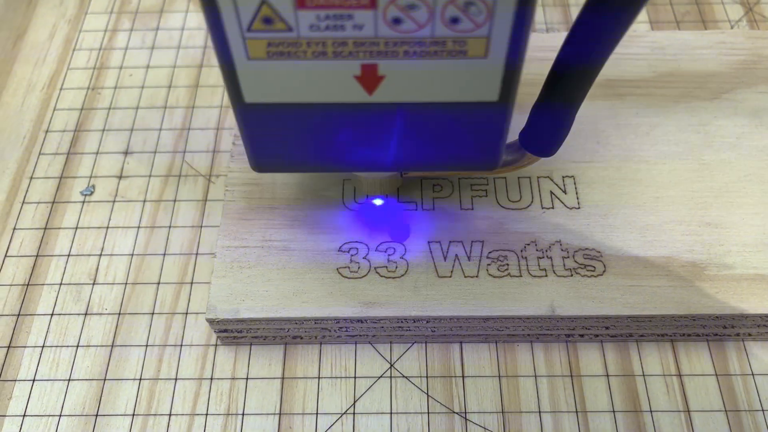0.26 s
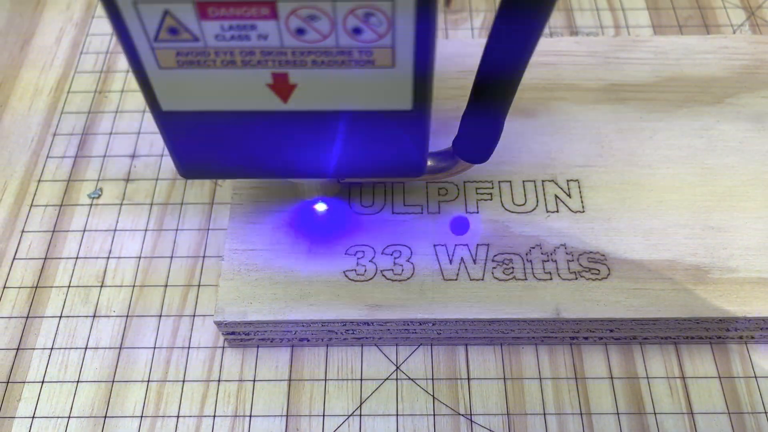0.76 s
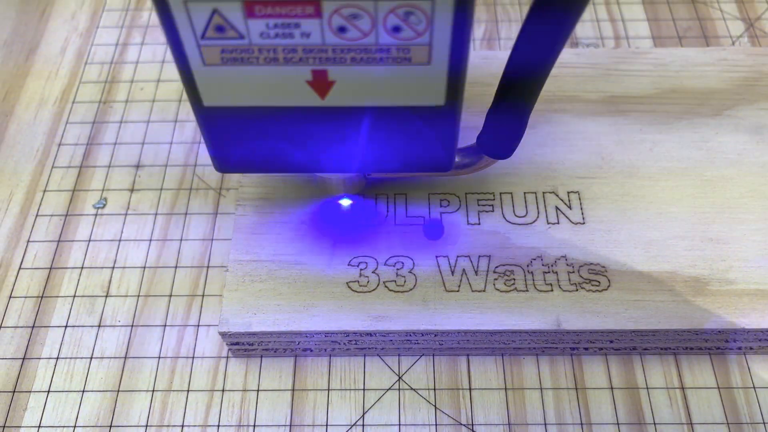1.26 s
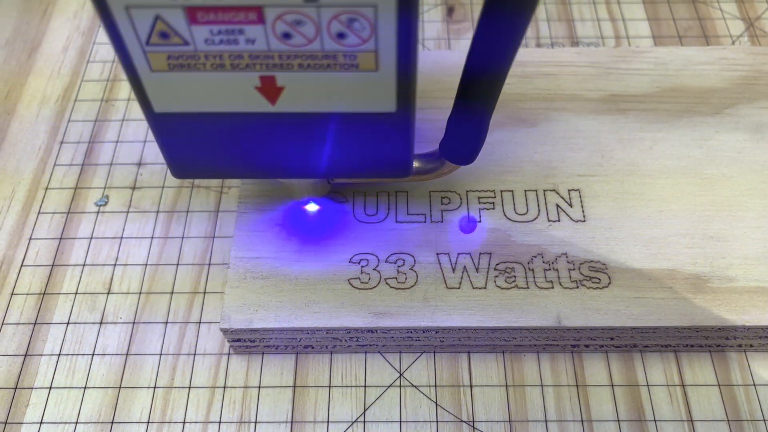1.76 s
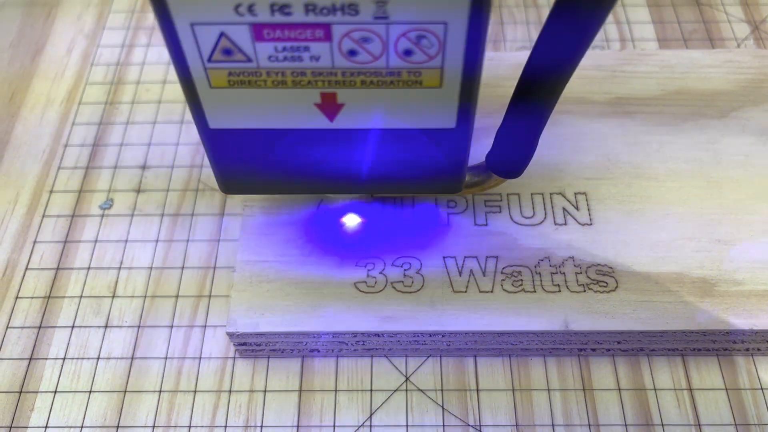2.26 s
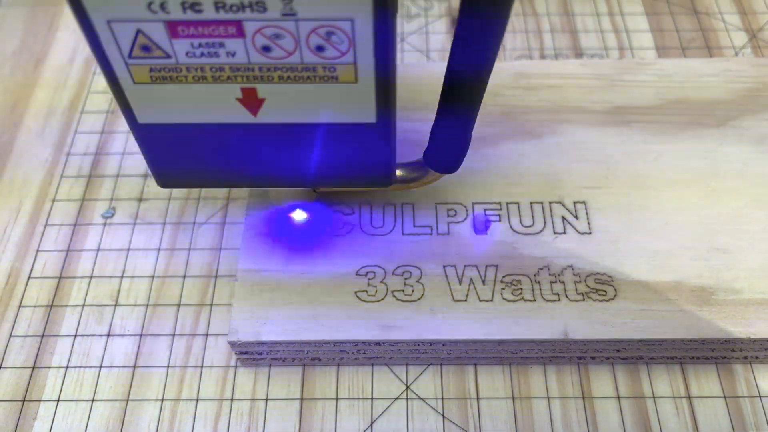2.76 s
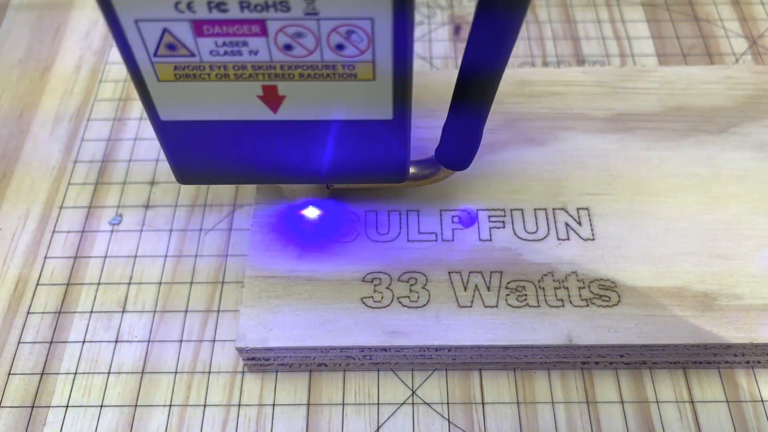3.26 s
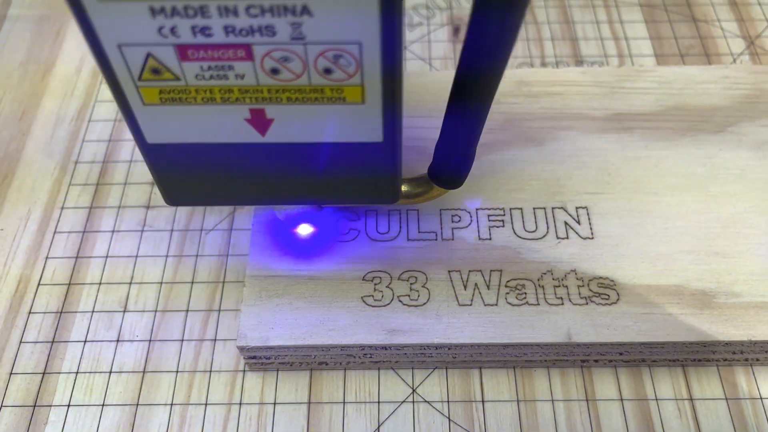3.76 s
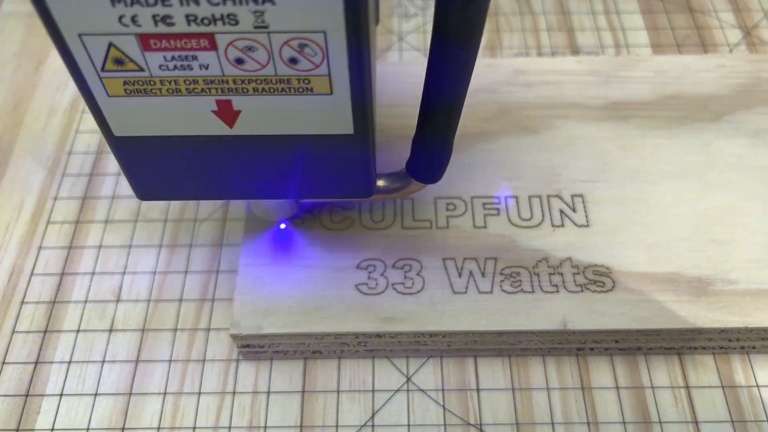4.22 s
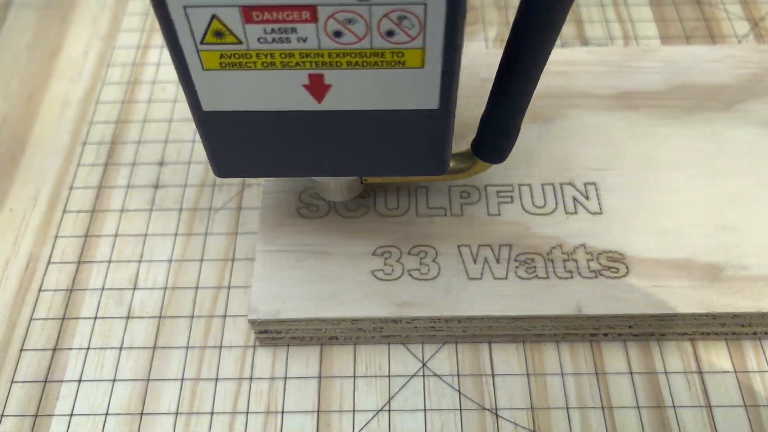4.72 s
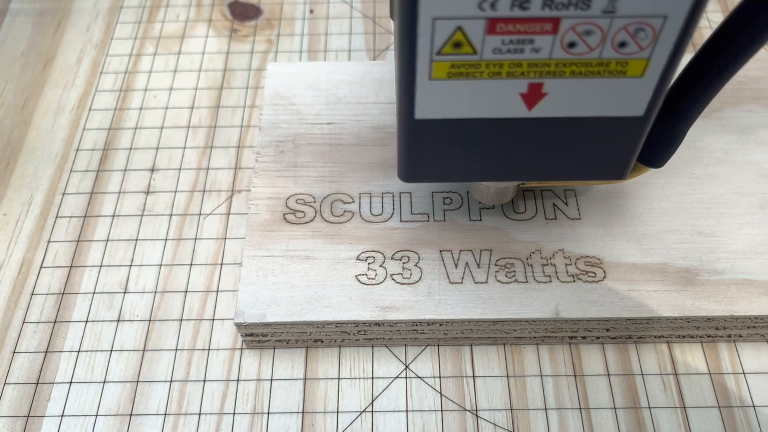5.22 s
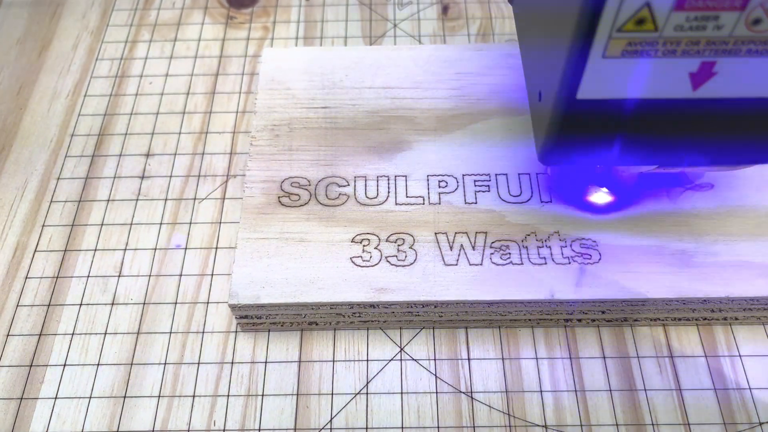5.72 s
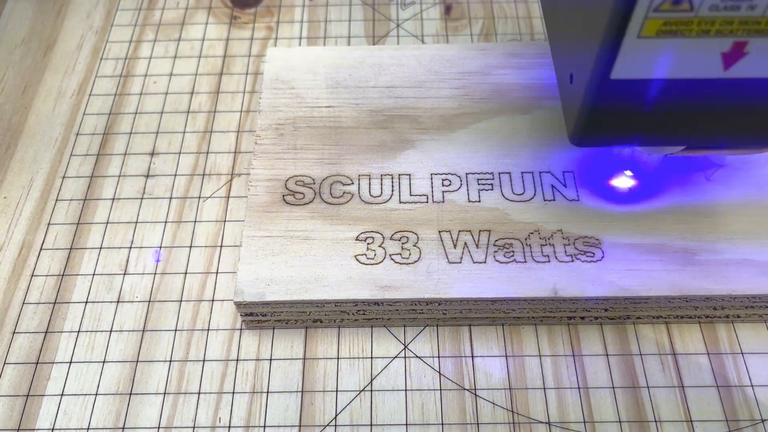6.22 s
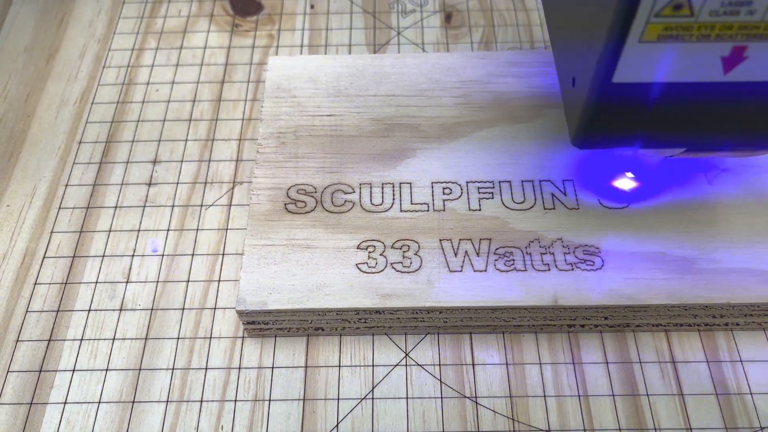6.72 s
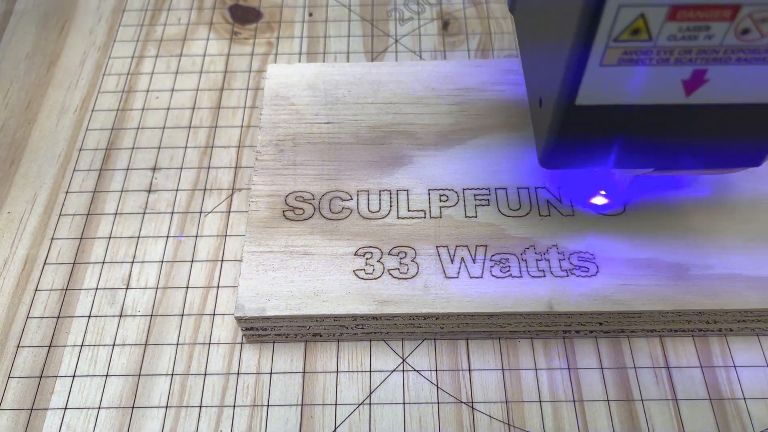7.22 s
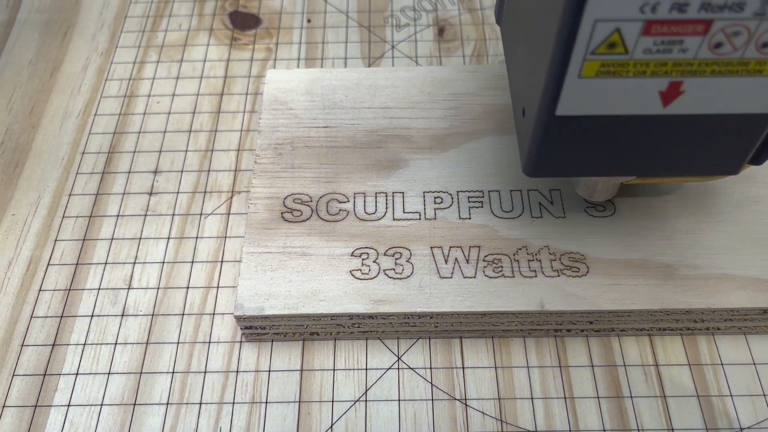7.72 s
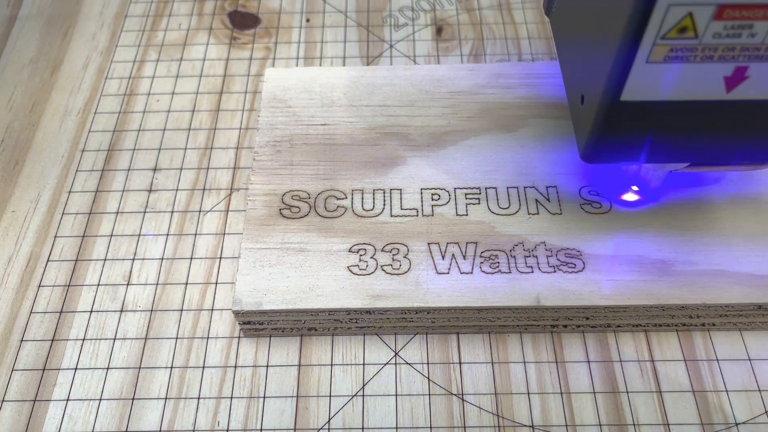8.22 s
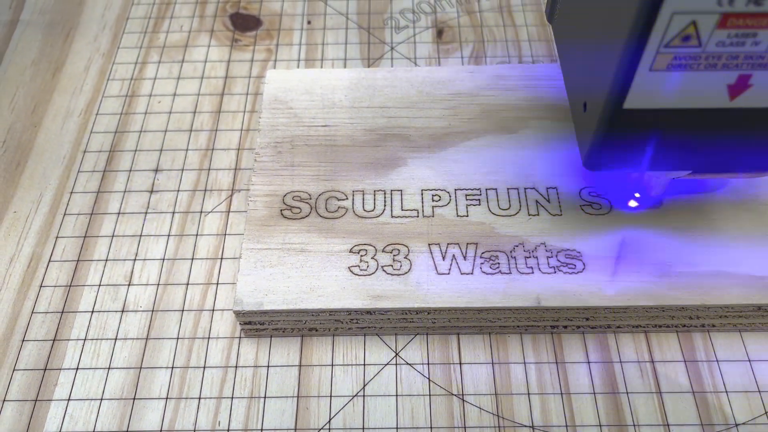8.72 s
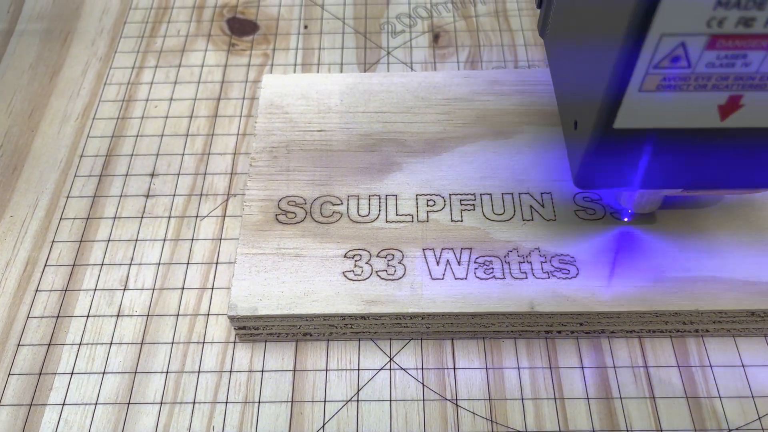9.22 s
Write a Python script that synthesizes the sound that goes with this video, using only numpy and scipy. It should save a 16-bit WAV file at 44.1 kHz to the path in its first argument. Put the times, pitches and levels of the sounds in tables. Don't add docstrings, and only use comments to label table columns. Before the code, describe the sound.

A laser engraver burns plywood close by, its cooling fan singing shrilly over pump hum, rushing air and an on-off buzzing, sizzling whistle.

```python
import sys
import numpy as np
from scipy import signal
from scipy.fft import rfft, irfft, next_fast_len
from scipy.io import wavfile
from scipy.ndimage import uniform_filter1d

SR = 44100
rng = np.random.default_rng(int(sys.argv[2]) if len(sys.argv) > 2 else 0)


def master(y):
    cut = np.clip(np.atleast_2d(y).T, -1, 1)
    pcm = np.round(cut * 32767)
    wavfile.write(sys.argv[1], SR, pcm.astype(np.int16))


def attenuation_scalar(level_db):
    decades = np.asarray(level_db, float) / 20
    return 10 ** decades


N = 418068


def read(table, hz):
    curve_hz, value = np.transpose(table)
    return np.interp(np.log(hz + 1), np.log(curve_hz), value)


def walk(rate):
    steps = np.repeat(rng.standard_normal(int(rate * N / SR) + 2), 16)
    steps = uniform_filter1d(uniform_filter1d(steps, size=16), size=16)
    return 1.3 * np.interp(np.arange(N) * rate * 16 / SR, np.arange(len(steps)), steps)


def tones(table, hz, place, wobble_db, rate, blur):
    turn = 2 * np.pi * np.cumsum(hz + np.zeros(N)) / SR
    out = np.zeros((2, N))
    for multiple, *heard in table:
        from_left, from_front = heard[:3], heard[3:]
        left_db, right_db, lead = (a + (b - a) * place for a, b in zip(from_left, from_front))
        phase = multiple * turn + 2 * np.pi * rng.random() + blur * walk(rate)
        size = np.sqrt(2) * attenuation_scalar(wobble_db * walk(rate))
        left = attenuation_scalar(left_db) * np.sin(phase)
        right = attenuation_scalar(right_db) * np.sin(phase - lead)
        out += size * np.array([left, right])
    return out


# start_s, stop (0 first letter, 1 left, 2 passing, 3 in front, 4 in front and nearer)
TRAVEL = [
    (0, 0.),
    (.35, 0.),
    (.65, 1.),
    (4.7, 1.),
    (5.05, 2.),
    (5.4, 2.),
    (5.65, 3.),
    (7.3, 3.),
    (8.15, 4.),
    (9.48, 4.),
]


def head_stop(t):
    return np.clip(np.interp(t, *np.transpose(TRAVEL)), 0, len(FRONT_SHARE) - 1)


FRONT_SHARE = [
    0,
    0,
    .55,
    1,
    1,
]


def head_place(stop):
    return np.clip(np.interp(stop, range(len(FRONT_SHARE)), FRONT_SHARE), 0, 1)


# start_s, facing (negative nozzle away from the phone, positive toward it)
CREEP = [(0, -1.9), (1.3, -1), (2.9, -0.64), (4.5, 0.72), (5.6, 0.79), (6.7, 0.96), (7.3, 0.38),
         (8.3, 0.19), (9.48, -0.25)]


def head_creep(t):
    return np.interp(t, *np.transpose(CREEP))


# start_s, end_s, depth (0-1)
BEAM_OFF = [(.295, .504, 1), (.592, .622, 1), (1.117, 1.138, .9), (1.243, 1.257, .8), (2.336, 2.564, 1),
            (2.994, 3.016, 1), (3.124, 3.137, .8), (4.045, 4.057, .5), (4.167, 4.176, .7),
            (4.663, 5.659, 1), (6.566, 6.592, .9), (6.705, 6.722, .6), (7.58, 7.62, .75), (7.735, 7.99, 1),
            (8.36, 8.468, 1), (8.705, 8.725, .9), (8.914, 8.927, .8), (9.037, 9.06, .9), (9.468, 9.5, .6)]
FADE_S = .004


def burning(t):
    dark = sum(((t > a - FADE_S) & (t < b + FADE_S)) * depth for a, b, depth in BEAM_OFF)
    return uniform_filter1d(np.clip(1 - dark, 0, 1), int(FADE_S * SR))


# multiple, from the left left_db, right_db, left_leads_rad, then the same from the front
PUMP = [(2, -35, -36.5, 0.27, -35.5, -36, 0.079), (4, -44, -47, 0.23, -44, -46.5, -0.077),
        (6, -49.5, -52.5, 0.18, -49.5, -52.5, .1), (8, -54.5, -52, .1, -51, -52.5, -0.23),
        (10, -49, -56, 0.92, -50, -57.5, -0.065), (14, -50.5, -75, .4, -54.5, -60, -.1),
        (15, -53.5, -65, .5, -57, -60, -.2), (16, -56, -64, .2, -59, -62, -.1),
        (17, -60, -64, .1, -60, -62, -.3), (18, -62, -60, .1, -61, -64, -.4),
        (19, -67, -74, .4, -59, -54, -.2)]
PUMP_HZ = 50.2


def pump_hum(place):
    surge = attenuation_scalar(.35 * walk(1.6))
    return surge * tones(PUMP, PUMP_HZ, place, wobble_db=0.36, rate=6, blur=0.088)


MAINS = [(2, -53.5, -46, .1, -49.5, -47, 0.), (4, -58.5, -51.5, .2, -53.5, -51.5, 0.)]
MAINS_HZ = 60.1


def mains_hum(place):
    return tones(MAINS, MAINS_HZ, place, wobble_db=-1.0, rate=4.4, blur=0.053)


FAN_LOADED_HZ, FAN_FREE_HZ, FAN_START_HZ, FAN_LAG_S = 1172.7, 1178.2, 1174.6, .52


def fan_rate(burn):
    keep = np.exp(-1 / (FAN_LAG_S * SR))
    goal = FAN_FREE_HZ + (FAN_LOADED_HZ - FAN_FREE_HZ) * burn
    return FAN_START_HZ + signal.lfilter([1 - keep], [1, -keep], goal - FAN_START_HZ)


FAN = [(1, -26, -33, 2.2, -28.6, -27, .45), (2, -40, -39.5, .2, -43.5, -43.5, .1),
       (3, -40.7, -41.7, .2, -52, -52, 1.), (4, -49, -52, .4, -54, -54, .7),
       (16 / 7, -54, -55, .5, -59, -59, 0.)]
FAN_TURN_DB = -0.16


def fan_song(burn, place, creep):
    song = tones(FAN, fan_rate(burn), place, wobble_db=0.24, rate=25, blur=0.16)
    return attenuation_scalar(FAN_TURN_DB * creep) * song


BEAM = [(1, -38, -39, .3, -40.5, -35.6, -.1), (2, -36.6, -38.3, .7, -36.3, -36, .25),
        (3, -43.5, -44.5, 1.5, -46, -47, 0.), (4, -48, -60, -2., -52, -52, .3),
        (5, -48, -54, 0., -56, -55, 0.), (6, -43, -48, -1.3, -43, -47, -1.45),
        (7, -49, -47, -1.6, -50.5, -49.5, -1.7)]
CHOP_HZ = 1000
BEAM_TURN_DB = 0.4


def beam_whistle(burn, place, creep):
    whistle = tones(BEAM, CHOP_HZ, place, wobble_db=.45, rate=15, blur=.05)
    return burn * attenuation_scalar(BEAM_TURN_DB * creep) * whistle


# pitch_hz, level_db (per Hz)
RUSH_LOW = [
    [(25, -83), (41, -70), (69, -60), (272, -67), (323, -69.5), (900, -67), (1300, -57.5), (1550, -65.5), (1750, -65), (1950, -69.5), (2200, -72.5)],
    [(25, -89), (41, -67), (58, -67), (137, -62), (193, -71), (229, -68), (758, -70.5), (1350, -59), (1700, -68.5), (2000, -67.5), (2200, -71)],
]
# pitch_hz, level_db (per Hz)
RUSH_HIGH = [(2200.0, -72.0), (2800.0, -68.1), (3300.0, -67.9), (4600.0, -64.3), (5200.0, -65.0),
             (6100.0, -63.9), (7200.0, -66.4), (7900.0, -68.9), (8600.0, -64.6), (9500.0, -65.6),
             (10000.0, -67.2), (10500.0, -66.5), (12500.0, -70.2), (15650.0, -74.4)]
# pitch_hz, balance_db
BALANCE = [
    [(25, -0.16), (383, 1.23), (758, 7.68), (1050, 3.37), (1290, 9), (1500, -4.2), (4000, 7.79), (4400, 2.35), (5250, 2.4), (5550, 6.59), (6850, -0.64), (15650, -0.0)],
    [(25, 0.24), (272, -1.75), (539, 1.73), (1000, -3.25), (1350, 2.16), (1600, -0.72), (2950, 0.77), (4300, -2.58), (5100, -0.6), (5650, 3.79), (6800, -0.57), (15650, -0.0)],
]
# pitch_hz, lead_rad
LEAD = [
    [(25, .07), (900, .27), (1200, 2.3), (1400, 1.85), (1650, 2.6), (1850, .13), (3100, 1.6), (3900, 1.1), (4050, -1.1), (4700, .18), (5600, -1.1), (7100, -1.7), (7650, -2.85), (8300, -3.25), (8900, -3.82)],
    [(25, .06), (100, .1), (380, -.2), (1200, .35), (1900, 0.), (3400, 0.), (4600, .75), (5200, 0.), (5750, -1.37), (6950, -1.6), (7800, -2.8), (8900, -3.25)],
]
# pitch_hz, lead_rad
LEAD_TOP = [(11150, -6.), (12950, -6.6), (14600, -9.), (15650, -9.75)]
# pitch_hz, likeness (0-1)
LIKENESS = [
    [(25, .98), (150, .95), (400, .7), (1400, .87), (1700, .4), (2200, .95), (2900, .7), (3150, .2), (3600, .6), (3950, .1), (4500, .9), (5500, .82), (8000, .94), (15650, .93)],
    [(25, .98), (150, .97), (400, .7), (1400, .88), (1650, .6), (1850, .95), (3300, .93), (4300, .82), (5200, .9), (7000, .87), (8400, .945), (15650, .93)],
]
# pitch_hz, width_hz, level_db
RIDGES_START = [(1100, 160, -3.8), (1410, 740, 2.5), (1750, 160, -3.2), (2140, 180, -1.5), (3180, 320, -3),
                (5160, 280, -4), (6300, 300, -5), (7810, 580, -6.5), (8770, 1830, 6.5), (9400, 300, -7.5),
                (10500, 300, -4.5), (11100, 450, 3), (11650, 350, -5), (12200, 400, 2.5)]
RIDGES_LEFT = [(1100, 160, -3.8), (1750, 160, -3.2), (2140, 180, -4), (3050, 690, 2.5), (3160, 300, -7.5),
               (4790, 550, 4.1), (5160, 280, -2.2), (7810, 580, -6.5), (8770, 1830, 6.5), (9210, 370, -4.1),
               (10060, 530, -4.7), (10690, 250, 1.8), (11850, 1140, -2.5), (15600, 1940, 2.3)]
RIDGES_PASSING = [(2470, 200, -3.5), (2770, 250, 3.9), (3640, 260, 4.8), (4060, 240, -9), (4980, 410, -2.2),
                  (5430, 300, 3.6), (6300, 440, 5.1), (7010, 270, 4), (7140, 1850, -3.2), (8520, 400, 8.3),
                  (8980, 230, -4), (9470, 440, 6.8), (10130, 2360, -3.3), (10360, 360, 5.2)]
RIDGES_FRONT = [(2460, 260, -5.5), (3270, 370, -7.2), (4210, 230, -5.5), (4650, 320, 8.9),
                (4650, 2900, 3.7), (4700, 830, -8.5), (5800, 280, -2.0), (8010, 550, -4), (8960, 430, -5.5),
                (10130, 210, -4.5), (10410, 350, 3.5), (11560, 400, 3.1), (12950, 250, -2.5),
                (14350, 1240, -2.9)]
RIDGES_NEAR = [(2460, 340, -4.5), (2770, 280, 3.0), (3170, 210, -6.5), (4890, 160, -3.3), (5550, 210, -2.7),
               (8460, 390, 4.5), (8970, 420, -7), (9820, 240, -5.5), (10250, 340, 4.7), (10760, 200, -2.5),
               (11320, 400, 2.8), (12450, 400, 4.0), (13160, 260, 3.3), (14920, 1010, -3.4)]
RIDGES = RIDGES_START, RIDGES_LEFT, RIDGES_PASSING, RIDGES_FRONT, RIDGES_NEAR


def path(stop, hz):
    front = np.clip(FRONT_SHARE[stop], 0, 1)

    def blend(pair, top=()):
        from_left, from_front = (read(list(table) + list(top), hz) for table in pair)
        return (1 - front) * from_left + front * from_front

    ridges_db = sum(db * np.exp(-2 * ((hz - f) / width) ** 2) for f, width, db in RIDGES[stop])
    colour = attenuation_scalar(blend(RUSH_LOW, RUSH_HIGH[1:]) + 0.82 * ridges_db) * np.sqrt(SR / 2)
    ratio = attenuation_scalar(blend(BALANCE))
    right = colour * np.sqrt(2 / (1 + ratio ** 2))
    like = np.clip(blend(LIKENESS), 0, 1)
    delay = np.exp(-1j * blend(LEAD, LEAD_TOP))
    common = np.array([right * ratio, right * like * delay])
    scattered = np.array([0 * right, right * np.sqrt(1 - like ** 2)])
    return common, scattered


# pitch_hz, share (0-1)
JET = [(5000, 0.), (7000, .15), (10000, .2), (11500, .36), (15000, .36)]
# pitch_hz, share (0-1)
SIZZLE = [(1500, 0.), (2500, .1), (9500, .1), (11300, .45), (15000, .5)]
# pitch_hz, share (0-1)
HOUSING = [(2600, 0.), (3600, 0.97), (6000, 1.), (7200, 0.04)]
# pitch_hz, share (0-1)
WHISTLE = [(7900, 0.018), (8300, 1.), (9700, 0.71), (10200, 0.029)]
HOUSING_TURN_DB, WHISTLE_TURN_DB, SIZZLE_TURN_DB = -0.66, 1.4, 0.9


def air_rush(t, stop, burn, creep):
    size = next_fast_len(N)
    hz = np.arange(size // 2 + 1) * SR / size
    jet, sizzle = (np.clip(read(table, hz), 0, .5) for table in (JET, SIZZLE))
    fan = 1 - jet - sizzle
    housing, whistle = (fan * np.clip(read(table, hz), 0, 1) for table in (HOUSING, WHISTLE))
    open_fan = np.clip(fan - housing - whistle, 0, 1)
    turn = 2 * np.pi * PUMP_HZ * t
    puffs = 1 + 0.75 * np.cos(2 * turn) + 0.16 * np.cos(turn)
    chop = 1 + .6 * np.cos(2 * np.pi * CHOP_HZ * t)
    embers = uniform_filter1d(burn, int(.07 * SR))
    layers = [(open_fan, attenuation_scalar(0.29 * walk(9))),
              (housing, attenuation_scalar(HOUSING_TURN_DB * creep + .5 * walk(12))),
              (whistle, attenuation_scalar(WHISTLE_TURN_DB * creep + 0.25 * walk(8.1))),
              (jet, 0.93 * puffs * attenuation_scalar(0.2 * walk(8))),
              (sizzle, .9 * chop * embers * attenuation_scalar(SIZZLE_TURN_DB * creep + 1.3 * walk(14)))]
    air = 0
    for share, swell in layers:
        noise = swell * rng.standard_normal((2, N))
        air = air + np.sqrt(share) * rfft(noise, size)
    out = np.zeros((2, N))
    for k in range(len(RIDGES)):
        common, scattered = path(k, hz)
        nearness = np.clip(1 - abs(stop - k), 0, 1)
        out += nearness * irfft(common * air[0] + scattered * air[1], size)[:, :N]
    return out


# start_s, length_s, pitch_hz, level_db
GRUNTS = [(.02, .05, 245, -47), (0.582, .07, 101, -38), (1.03, .08, 250, -43), (1.454, 0.098, 264, -42),
          (2.38, 0.096, 101, -32), (3.04, .05, 270, -46), (3.298, 0.13, 252, -47), (4.465, .06, 245, -43),
          (6.882, 0.17, 239, -46.5), (7.76, 0.13, 255, -48), (9.295, .06, 245, -43)]
GRUNT_GLIDE = 0.093


def stepper_grunts(t):
    out = np.zeros(N)
    for (start, length, hz, db), phase in zip(GRUNTS, rng.random((len(GRUNTS), 1))):
        now = (t > start) & (t < start + length)
        share = (t[now] - start) / length
        cycles = hz * length * share * (1 + GRUNT_GLIDE * (share - 1))
        swell = attenuation_scalar(db) * 2 * np.sin(np.pi * share)
        out[now] += swell * np.sin(2 * np.pi * (cycles + phase))
    return out


def scene():
    t = np.arange(N) / SR
    stop = head_stop(t)
    place = head_place(stop)
    creep = head_creep(t)
    burn = burning(t)
    mix = pump_hum(place) + mains_hum(place)
    mix += fan_song(burn, place, creep)
    mix += beam_whistle(burn, place, creep)
    mix += air_rush(t, stop, burn, creep)
    return mix + stepper_grunts(t)


def band_limit(x):
    return signal.sosfilt(signal.butter(12, 15760, fs=SR, output="sos"), x)


def record(dry):
    return band_limit(dry)


dry = scene()
out = record(dry)
master(out)
```